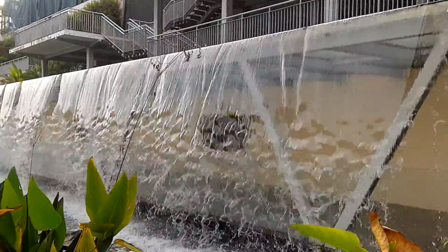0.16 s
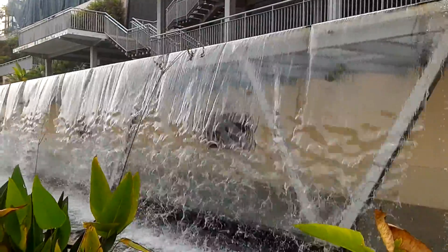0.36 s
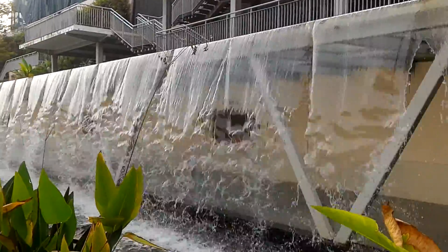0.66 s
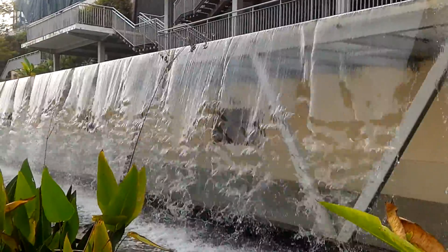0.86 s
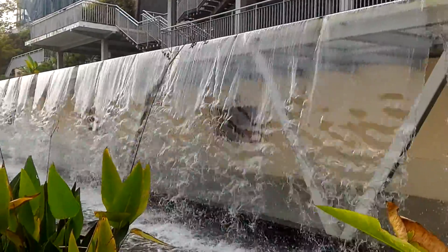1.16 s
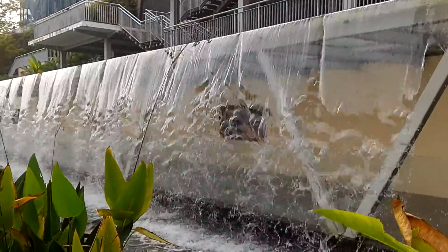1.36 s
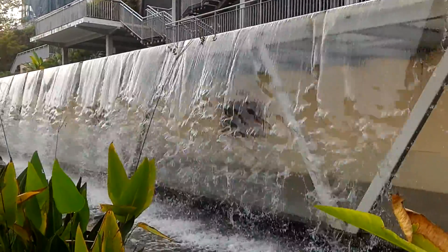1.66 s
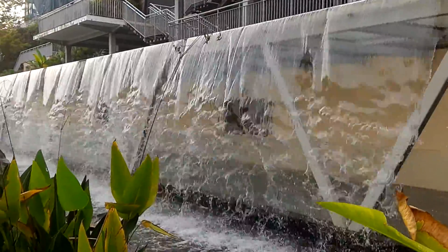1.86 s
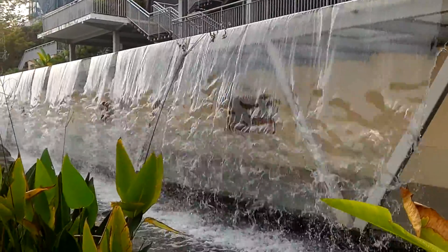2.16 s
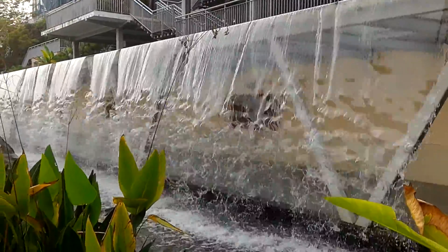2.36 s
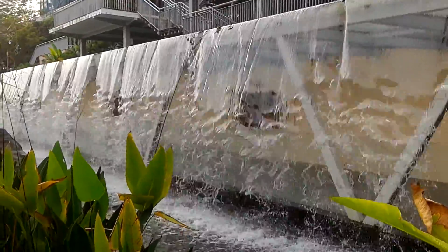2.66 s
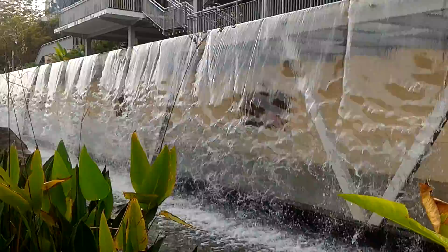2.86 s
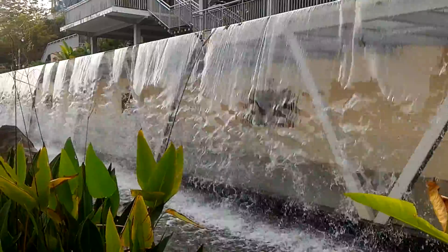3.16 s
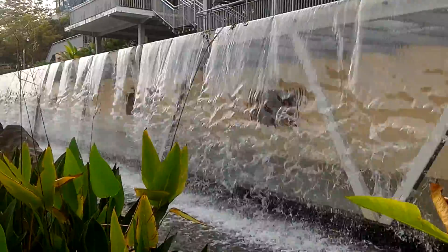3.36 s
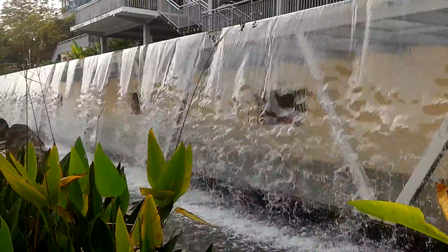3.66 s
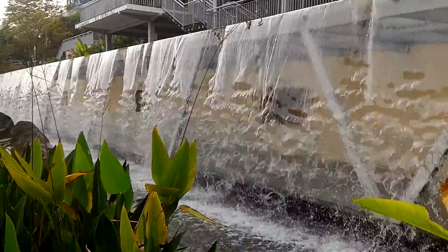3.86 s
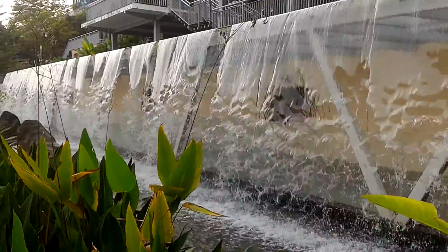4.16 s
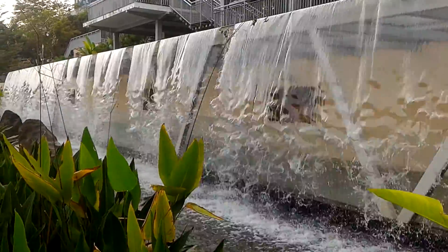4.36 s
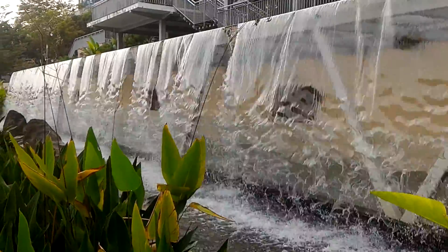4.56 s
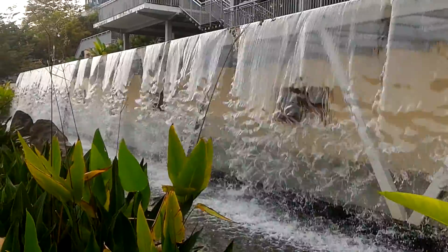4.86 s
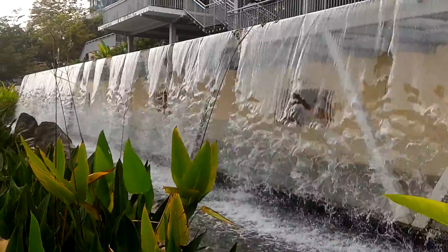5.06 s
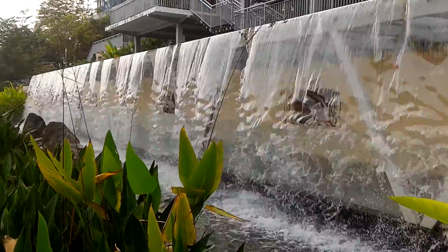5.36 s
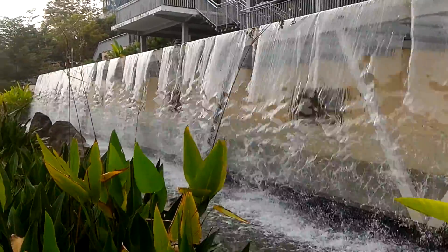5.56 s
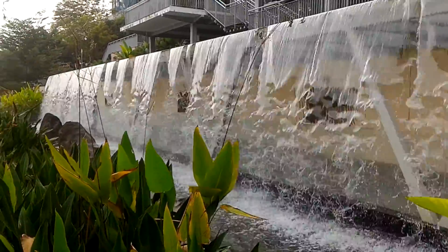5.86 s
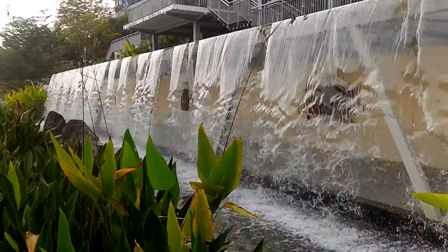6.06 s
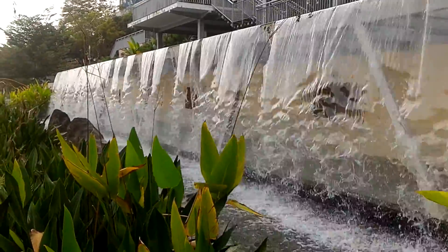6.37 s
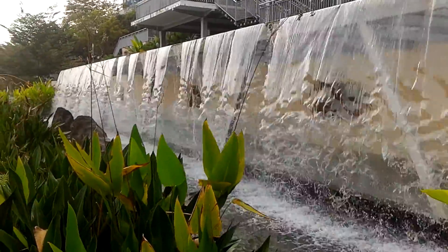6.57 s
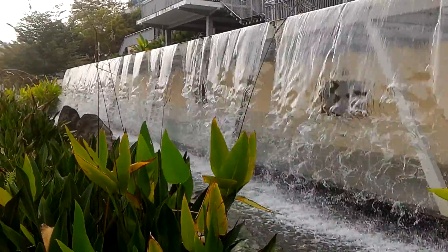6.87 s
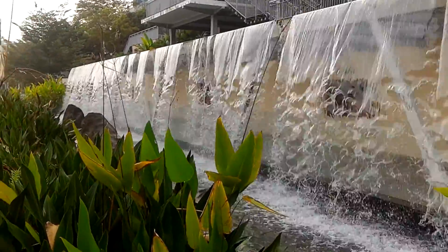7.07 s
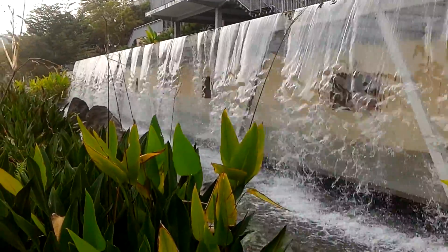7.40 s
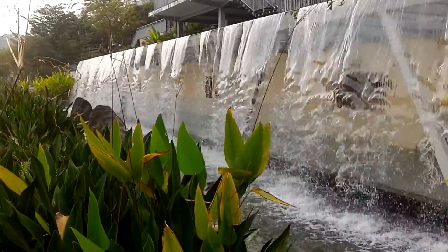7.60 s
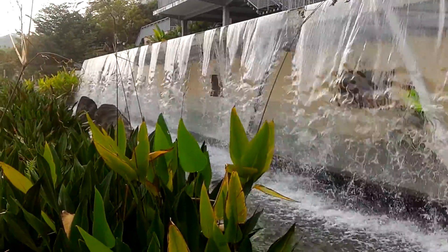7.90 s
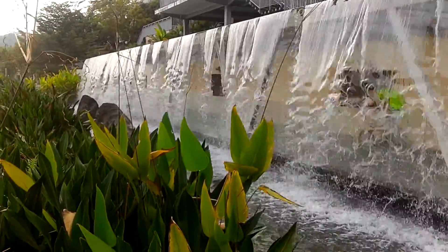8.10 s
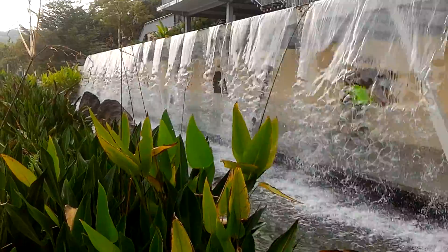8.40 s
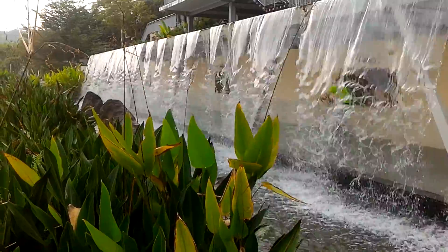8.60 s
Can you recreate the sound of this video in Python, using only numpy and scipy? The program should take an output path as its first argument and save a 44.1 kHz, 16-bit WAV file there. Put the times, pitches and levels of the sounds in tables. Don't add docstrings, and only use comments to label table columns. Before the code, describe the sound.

A wide sheet of water pours off a long wall into a pool, a dense bright hissing roar with soft wind knocks on the microphone.

```python
import sys
import numpy as np
from scipy import signal
from scipy.fft import rfft, irfft
from scipy.io import wavfile

SR = 44100
rng = np.random.default_rng(int(sys.argv[2]) if len(sys.argv) > 2 else 0)


def volts_from_db(level):
    exponent = np.asarray(level, float) / 20
    return 10 ** exponent


def master(y):
    cut = np.clip(np.atleast_2d(y).T, -1, 1)
    pcm = np.round(cut * 32767)
    wavfile.write(sys.argv[1], SR, pcm.astype(np.int16))


N = 385434

# time in seconds, aim (1 = full on).
AIM = [
    (0.0, 1.0),
    (0.8, .9),
    (3.0, .7),
    (5.67, 0.37),
    (7.0, 0.18),
    (8.74, -0.12),
]
# frequency in Hz, level in dB per Hz.
WATER_SPECTRUM = [(60, -27), (170, -21), (400, -19), (900, -17), (2200, -15), (3000, -7), (6500, -8),
                  (9000, -16.5), (11000, -24.5), (13800, -28), (15800, -24), (18000, -27)]
# centre in Hz, width in Hz, gain in dB.
HOUSING_BELLS = [(270, 72, 1.5), (489, 233, -6), (762, 540, 3.5), (1107, 265, -4), (1380, 480, 1.5),
                 (1826, 170, -3.5), (2060, 300, 1), (2320, 200, -3), (3252, 670, 4), (4330, 770, -2),
                 (5200, 980, 3.5), (6390, 1350, -1), (7350, 1060, -2), (8480, 1200, 2), (12500, 1000, 1.2)]
# centre in seconds, peak in dB, length in seconds.
GUSTS = [(0.05, -41, 0.074), (1.65, -35, 0.067), (2.2, -41, .2), (2.4, -38, .07), (2.53, -36, .14),
         (3.16, -42, .1), (3.43, -33, 0.062), (3.63, -39, .1), (3.8, -40, .1), (4.13, -36, .07),
         (4.22, -31, 0.076), (4.28, -38, .07), (4.56, -36, 0.18), (5.18, -45, .1), (5.84, -41, .05),
         (6.8, -45, .1), (7.42, -39, .1), (7.89, -38.5, .15), (8.23, -45, .12)]
# frequency in Hz, level in dB per Hz.
RUMBLE_SPECTRUM = [(10, -10), (22, -9), (40, 3), (62, 0), (120, -12.5), (200, -13), (400, -29)]
# centre in seconds, peak in dB, length in seconds.
SWELLS = [
    (0.41, -49, .3),
    (1.38, -49, 0.28),
    (2.3, -48, .2),
    (4.16, -50, .2),
    (4.6, -46, 0.36),
    (6.4, -52, .4),
    (6.96, -50, .3),
    (8.1, -51, .4),
]
# start in seconds, peak in dB, bottom in Hz, top in Hz,
# length in seconds.
KNOCKS = [
    (1.24, -22.5, 130, 850, .008),
    (1.626, -23, 180, 620, .004),
    (7.708, -29, 170, 400, .014),
    (3.885, -33, 200, 290, .03),
    (4.203, -21, 70, 190, .002),
    (4.83, -33, 200, 290, .02),
    (4.26, -25, 50, 130, .002),
    (3.464, -28, 70, 120, .002),
    (1.636, -29, 75, 170, .002),
]
# centre in seconds, lowest band in Hz,
# number of bands.
PARTED_BANDS = [(0.199, 13780, 1), (0.756, 5680, 2), (1.337, 10340, 2), (1.685, 4220, 4), (1.848, 10340, 1),
                (2.126, 4650, 1), (2.173, 4220, 1), (2.753, 7580, 1), (2.962, 7580, 1), (3.171, 6890, 2),
                (3.659, 4220, 1), (3.705, 4650, 1), (4.146, 6290, 3), (4.216, 6290, 1), (4.866, 4650, 2),
                (4.89, 8960, 1), (5.284, 10340, 1), (6.376, 4220, 2), (6.515, 4220, 3)]


def rms_one(x):
    return x / np.sqrt(np.mean(x ** 2) + 1e-20)


def in_time(rows):
    times_s, *columns = np.transpose(rows)
    return [np.interp(np.arange(N) / SR, times_s, column) for column in columns]


def coloured(x, points):
    hz = np.maximum(np.arange(N // 2 + 1) * SR / N, 1)
    points_hz, points_db = np.transpose(points)
    level_db = np.interp(np.log(hz), np.log(points_hz), points_db)
    return irfft(rfft(x) * volts_from_db(level_db), N)


def band(x, low_hz, high_hz):
    sos = signal.butter(2, [low_hz, min(high_hz, .45 * SR)], "band", fs=SR, output="sos")
    return signal.sosfilt(sos, x)


def drift(rate_hz):
    thin, settle = 40, 2000
    r = np.exp(-2 * np.pi * rate_hz * thin / SR)
    white = rng.standard_normal(N // thin + settle + 2)
    slow = signal.lfilter([1], [1, -2 * r, r * r], white)[settle:]
    return np.interp(np.arange(N) / thin, np.arange(len(slow)), rms_one(slow))


def bumps(rows, calm_db):
    t = np.arange(0, N / SR, .002)
    rises = sum(volts_from_db(db) ** 2 * np.exp(-(2 * (t - s) / length_s) ** 2) for s, db, length_s in rows)
    return np.sqrt(volts_from_db(calm_db) ** 2 + np.interp(np.arange(N) / SR, t, rises))


def turning(hz, body_db, spray_db):
    octave = np.log2(hz / 4000)
    low, high = np.clip(-octave, 0, 1), np.clip(octave, 0, 1)
    return low * (body_db - body_db.mean()) + high * (spray_db - spray_db.mean())


def roar(body_db, spray_db, shared_db, own_db):
    together = drift(11.0) + 1.3 * drift(30.0)
    white = rng.standard_normal((2, N))
    edges_hz = 40 * 2 ** np.arange(0, 9.1, .5)
    out = 0
    for k, (low_hz, high_hz) in enumerate(zip(edges_hz, edges_hz[1:])):
        near = np.clip(np.log2(high_hz / 350) / 4, 0, 1)
        flicker_db = near * (shared_db * together + own_db * drift(15.0))
        aim_db = turning(np.sqrt(low_hz * high_hz), body_db, spray_db)
        out = out + volts_from_db(flicker_db + aim_db) * band(white[k % 2], low_hz, high_hz)
    return rms_one(out)


def bubbles(per_s, cycles, spread_db):
    sizes = volts_from_db(spread_db * np.minimum(rng.exponential(1, N), 5)) * rng.choice([-1, 1], N)
    born = rng.random(N) < per_s * volts_from_db(2.5 * drift(10.0)) / SR
    pitches_hz = np.geomspace(900, 18000, 48)
    dealt = rng.integers(0, 48, N)
    out = 0
    for k, hz in enumerate(pitches_hz):
        r = volts_from_db(-60 * hz / (cycles * SR))
        w = 2 * np.pi * hz / SR
        clicks = sizes * born * (dealt == k) * hz / 4000 + 1e-18
        out = out + signal.lfilter([0, np.sin(w)], [1, -2 * r * np.cos(w), r * r], clicks)
    return rms_one(out)


def waterfall():
    roar_db_per_aim, body_db_per_aim, spray_db_per_aim = 1, -0.55, 1.9
    aim, = in_time(AIM)
    impacts = roar(body_db_per_aim * aim, spray_db_per_aim * aim, shared_db=0.27, own_db=0.25)
    ringing = volts_from_db(-14) * bubbles(per_s=2500, cycles=15.0, spread_db=4.0)
    return volts_from_db(roar_db_per_aim * aim) * coloured(impacts + ringing, WATER_SPECTRUM)


def housing(x):
    hz = np.arange(N // 2 + 1) * SR / N
    gain_db = sum(db * np.exp(-(2 * (hz - at_hz) / wide_hz) ** 2) for at_hz, wide_hz, db in HOUSING_BELLS)
    return irfft(rfft(x) * volts_from_db(gain_db), N)


def town():
    level_db, wander_db = -49, 1.5
    rumble = rms_one(coloured(rng.standard_normal(N), RUMBLE_SPECTRUM))
    return bumps(SWELLS, level_db + wander_db * drift(1.5)) * volts_from_db(4.5) * rumble


def wind_boom():
    breeze_db, flutter_db = -45.5, 2.2
    boom = rms_one(band(band(rng.standard_normal(N), 58, 120), 76.6, 133))
    return bumps(GUSTS, breeze_db + flutter_db * drift(1.7)) * volts_from_db(-2.5) * boom


def wind_knocks():
    t, air = np.arange(N) / SR, rng.standard_normal(N)
    out = np.zeros(N)
    for s, peak_db, bottom_hz, top_hz, length_s in KNOCKS:
        push = np.arange(N) == round(s * SR)
        rustle = 0.084 * air * np.exp(-((t - s) / length_s) ** 2)
        knock = band(push + rustle + 1e-18, bottom_hz, top_hz)
        out -= volts_from_db(peak_db) * knock / np.abs(knock).max()
    return out


def part_bands(dry):
    half = 1024
    hz = np.arange(half + 1) * SR / (2 * half)
    window = signal.windows.kaiser_bessel_derived(2 * half, 4 * np.pi)
    out = dry.copy()

    def cut(start, inside):
        piece = window * dry[0, start:start + 2 * half]
        return window * irfft(rfft(piece) * inside)

    for s, lowest_hz, count in PARTED_BANDS:
        lows_hz = lowest_hz + 3500 * np.arange(count)[:, None]
        highs_hz = lows_hz * 1.08 + 700
        inside = ((hz > lows_hz) & (hz < highs_hz)).any(axis=0)
        at = round(s * SR) - half
        same = cut(at, inside)
        other = cut(at + 8 * half, inside)
        out[:, at:at + 2 * half] += 0.77 * other * [[1], [-1]] - (1 - np.sqrt(.5)) * same
    return out


def scene():
    water = volts_from_db(-17.5) * rms_one(housing(waterfall()))
    mono = water + town() + wind_boom() + wind_knocks()
    return np.stack([mono, mono])


def low_pass(x):
    return signal.sosfilt(signal.butter(12, 15740, fs=SR, output="sos"), x)


def record(dry):
    mix = part_bands(dry)
    return low_pass(mix)


dry = scene()
out = record(dry)
master(out)
```